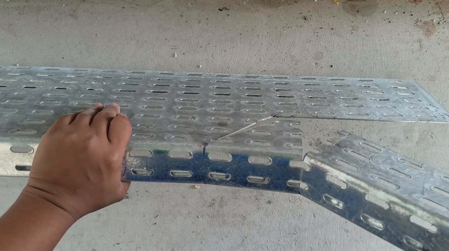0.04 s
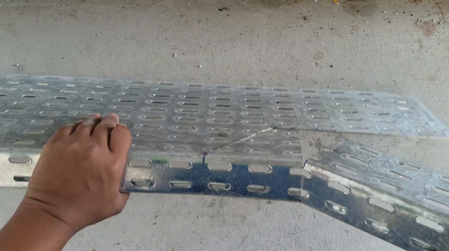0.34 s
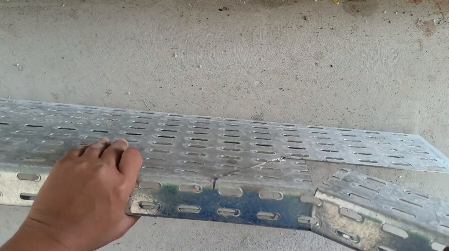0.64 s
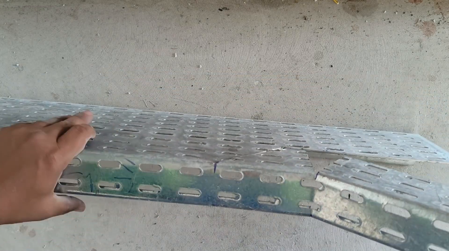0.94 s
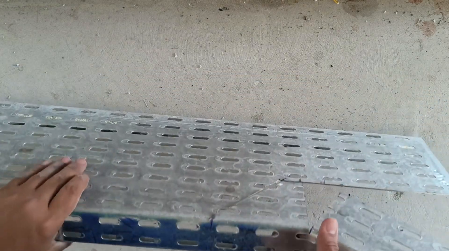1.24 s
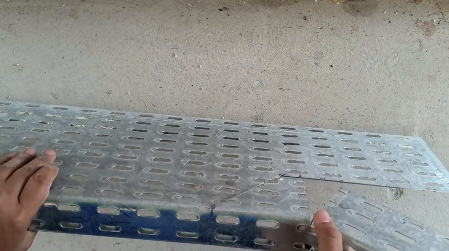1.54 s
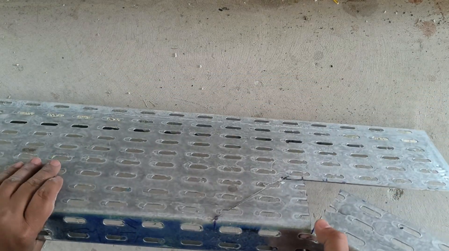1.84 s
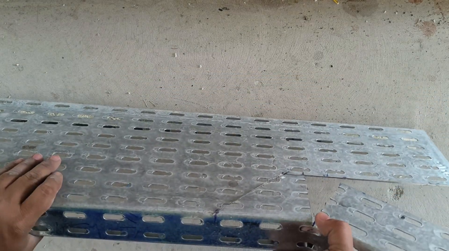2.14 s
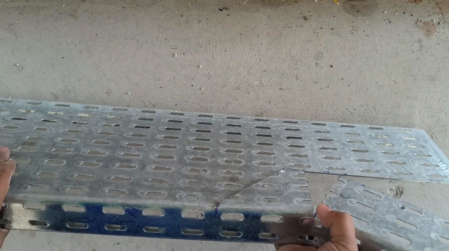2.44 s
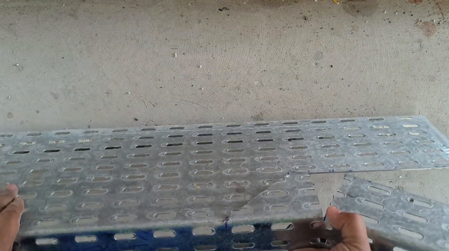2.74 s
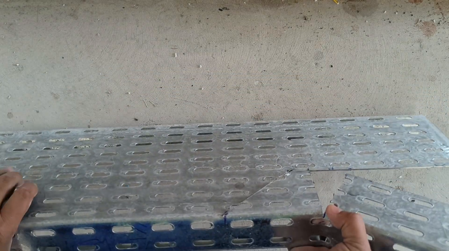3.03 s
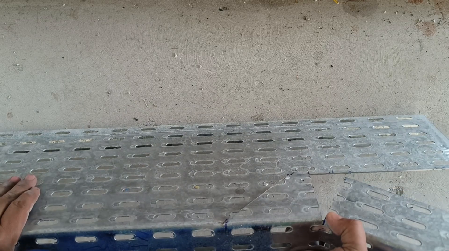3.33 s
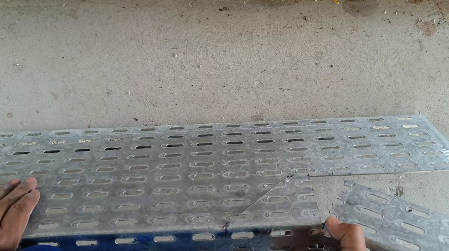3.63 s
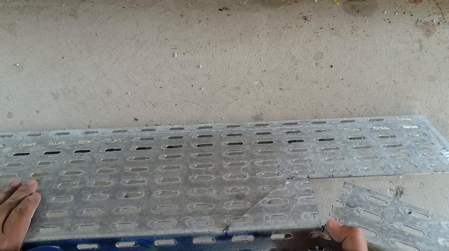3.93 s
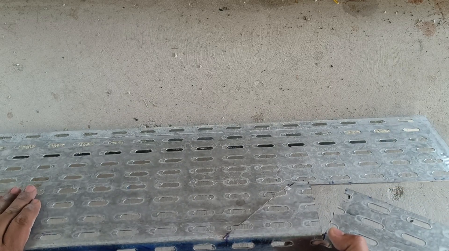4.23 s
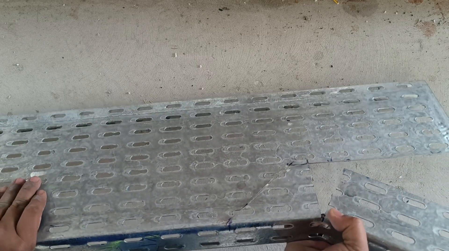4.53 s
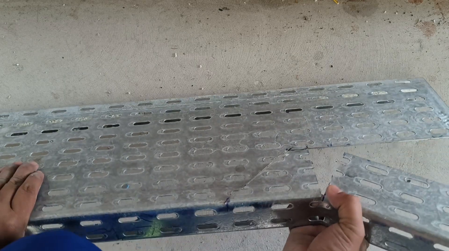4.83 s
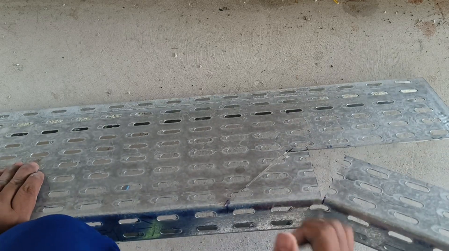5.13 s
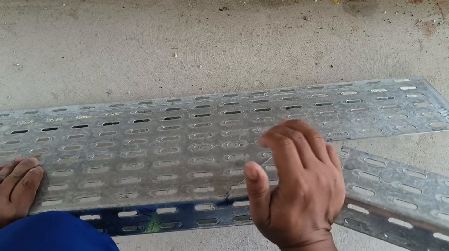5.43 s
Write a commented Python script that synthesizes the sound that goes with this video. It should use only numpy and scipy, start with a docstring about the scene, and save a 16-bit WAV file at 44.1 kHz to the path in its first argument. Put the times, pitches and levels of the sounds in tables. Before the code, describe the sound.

Three brief metallic scrapes come about two seconds apart as a slotted steel tray is shifted by hand on a concrete floor. Each one has a gritty hiss, a few knocks and its own ringing tone, and the first also squeaks. In the gaps, skin brushes the metal and grit or fingernails click lightly. The microphone is near, and the hard-walled workshop adds a short echo over a faint low hum.

```python
"""Steel cable tray on a workshop floor

A perforated tray is shoved three times over concrete, a little left of a closely spaced microphone pair.
Grit under its edges shakes the sheet, which rings differently each time it rests on new points.
Between the shoves hands slide over the metal and tap it; behind, the bare room echoes over a low rumble."""
import sys
import numpy as np
from scipy import signal
from scipy.fft import rfft, irfft, next_fast_len
from scipy.io import wavfile
from scipy.ndimage import map_coordinates

SR = 44100
rng = np.random.default_rng(int(sys.argv[2]) if len(sys.argv) > 2 else 0)


def inscribe(sig):
    """Save sig as 16-bit PCM at rate SR to the path in sys.argv[1].

    A 1-D sig is mono; a 2-D sig holds one channel per row.
    Samples are clipped to [-1, 1] before scaling.
    """
    pcm = np.round(np.clip(np.atleast_2d(sig).T, -1, 1) * 32767)
    wavfile.write(sys.argv[1], SR, pcm.astype(np.int16))


N = 250047

# The tray's moves; the last two run together as one shove. Levels in all tables are relative.
# Each row: start, speeding up and slowing in seconds, ease (small is a jerk), sheet, resonance and
# hiss levels in dB, length of the hiss as a share of the move's.
SHOVES = [(0.374, 0.21, 0.14, 1.94, -24, -24, -30.5, 1.04),
          (2.553, .16, 0.16, 0.71, -23.5, -27.5, -30.5, 1.01),
          (4.392, 0.048, 0.092, 2.64, -33.5, -48, -49.5, 0.59),
          (4.505, 0.053, 0.09, 0.58, -28, -30, -38.5, 0.76)]
# The edge knocks on the floor. Each row: time in seconds, level in dB.
BUMPS = [(0.427, -35), (0.449, -13), (0.481, -15), (0.535, -15), (0.627, -8.5), (1.837, -29.5), (2.57, -22),
         (2.667, -9.5), (2.689, -6), (2.73, -7.5), (2.755, -7.5), (4.435, -21), (4.519, -14),
         (4.591, -20.5)]
# The tray creeps under the grip. Each row: start, speeding up and slowing in seconds, level in dB.
CREEPS = [(0.881, 0.084, 0.8, -55), (1.6, 0.2, .07, -56), (1.828, 0.0095, .11, -46.5),
          (5.019, 0.04, 0.062, -55), (5.296, .022, 0.054, -56)]
# A slipping edge sings. Each row: midpoint and length in seconds, pitch in Hz, level in dB.
SQUEAKS = [(0.468, .07, 1402, -36), (0.471, 0.096, 3180, -37), (0.575, .15, 3219, -39),
           (1.649, 0.064, 1305, -63), (1.847, 0.033, 1350, -51), (5.322, .04, 1450, -65)]
# Hand slides. Each row: start, speeding up and slowing in seconds, rubbing and dust levels in dB.
RUBS = [(0.368, 0.033, .05, -50, -56.5), (0.76, 0.06, .08, -59, -72), (0.85, 0.11, 0.093, -57, -55.5),
        (1.14, 0.1, 0.067, -61.5, -73), (1.245, 0.11, 0.037, -51.5, -54), (1.388, .09, 0.055, -64, -56.5),
        (1.655, 0.021, 0.023, -63.5, -77), (1.705, .062, 0.05, -54.5, -59),
        (1.835, .05, 0.049, -50.5, -53.5), (1.925, 0.043, 0.022, -54.5, -61), (2.124, .022, .04, -61, -69),
        (2.189, 0.054, 0.074, -50.5, -50), (2.3, .13, .11, -62, -55), (2.98, 0.07, 0.18, -57.5, -67.5),
        (3.271, .09, .17, -64.5, -69.5), (3.514, 0.025, 0.037, -70, -80), (3.62, 0.021, 0.037, -72.5, -79),
        (3.765, 0.022, 0.027, -82, -87), (4.051, 0.077, 0.0353, -69, -70),
        (4.987, 0.077, 0.089, -59, -68.5), (5.285, 0.027, 0.078, -67, -75),
        (5.375, 0.062, .04, -62.5, -63.5), (5.548, .018, 0.043, -75, -74)]
# Grit and fingernails tick. Each row: time in seconds, level in dB, added treble and body in dB.
TICKS = [(0.2861, -33, -16.5, -20.5), (0.426, -28, -6, -2), (0.627, -20, -1, -2), (1.2804, -33, -6.5, -7.5),
         (1.3268, -42, -14, -10), (1.838, -46, -1, -16), (1.8716, -41, 0, -5.5), (1.8978, -43.5, 0, -2.5),
         (2.143, -52, -14, -8.5), (2.2543, -32, -7.5, -21), (2.689, -12.5, -9, -3.5),
         (3.021, -47, -3.5, -12), (3.083, -51, 1, -12), (3.786, -63, -8, -4), (4.1065, -44, -11, -7.5),
         (4.556, -20.5, -11.5, -2), (5.44, -37, -7, -4.5), (5.596, -61, -18, -8.5)]

# The sheet's broad colour in each move. Each row: frequency in Hz, spectral density in dB.
SHEET_PULL = [(80, -45), (170, -16), (280, -13), (400, -14.5), (700, 2), (950, -4.5), (1350, 8),
              (1700, -5.5), (2100, -5), (2900, -3), (4200, -8.5), (5200, -11), (7300, -10), (9500, -27.5),
              (12000, -63.5)]
SHEET_TURN = [(80, -32.5), (170, -26.5), (280, -4), (400, -17.5), (700, -6.5), (950, -9), (1350, -0.5),
              (1700, -0.5), (2100, -5), (2900, -2.5), (4200, -6), (5200, -12), (7300, -11.5), (9500, -29.5),
              (12000, -55.5)]
SHEET_NUDGE = [(180, -55), (300, -3.5), (490, -33), (954, -13), (1030, 5.5), (1120, -26), (1370, 5.5),
               (1940, -10.5), (3310, -12.5), (7760, -31.5), (9500, -53), (12400, -90), (20900, -120)]
SHEET_PUSH = [(80, -34), (170, -11.5), (280, -11.5), (400, -13), (700, -10.5), (950, -7.5), (1350, 1),
              (1700, 0), (2100, -8.5), (2900, -7), (4200, -14.5), (5200, -18.5), (7300, -17), (9500, -32),
              (12000, -67)]
# The colours of the other sounds. Each row: frequency in Hz, spectral density in dB.
FLEX_COLOUR = [(30, -16.5), (90, -6), (200, -3), (300, -3.5), (600, -31.5), (2000, -90)]  # the whole sheet flexing as it is dragged
HISS_COLOUR = [(5000, -26), (8500, -11), (8940, -17), (9520, -31.5), (10300, -13.5), (11900, -9.5),
               (12800, -1), (13900, -5.5), (15300, -6), (16000, -16)]  # crushed grit and dust
CREEP_COLOUR = [(100, -29.5), (300, -15.5), (700, 1.5), (950, -7), (1350, 2.5), (1800, -1), (2100, -19.5),
                (2600, -4.5), (4500, -20), (9000, -37)]
SKIN_COLOUR = [(200, -36.5), (600, -6.5), (1400, -5), (2050, -10.5), (2750, -2.5), (3600, 1.5),
               (4200, -8.5), (4600, -3.5), (6200, -9), (7100, -1.5), (9500, -27.5), (12400, -51)]
TICK_COLOUR = [(2500, -38), (4200, -13.5), (4900, 0), (6000, -6), (7000, -9.5), (8000, -9), (9500, -33.5),
               (12400, -51)]
RUMBLE_COLOUR = [(12, -25.5), (20, -11.5), (91, -11), (150, -10), (228, -5), (285, -9), (328, -7.5),
                 (459, -20), (873, -24), (1120, -28.5), (1330, -25), (1570, -34.5), (1710, -33),
                 (2260, -36.5), (16000, -72)]
# The strongest resonances for each way the tray rests. Each row: frequency in Hz, level in dB.
MODES_PULL = [(285, -10), (563, -5), (966, -2.5), (1009, -27), (1098, 0.5), (1262, -0.5), (1319, -6.5),
              (1408, -24), (1518, -3), (1669, -19.5), (1715, 0), (1803, -3.5), (2213, -11), (2328, -13.5),
              (2517, -7), (2606, -8), (2778, -2.5), (2998, -12), (3227, 1.5), (3327, -4), (3397, -21),
              (3502, -9), (3647, -17), (4447, -9), (4544, -23.5), (4788, -16.5), (5130, -7), (5284, -12)]
MODES_TURN = [(466, -8), (630, -7.5), (807, -15.5), (877, -15), (1192, -5.5), (1265, 1), (1332, -6),
              (1467, -8.5), (1645, -21), (1701, -13), (1750, -5), (2789, -14.5), (2826, -8), (3133, -17),
              (3265, -7), (3332, -30.5), (3445, -5.5), (3787, -15.5), (3873, -24.5), (4121, -31.5),
              (4452, -22.5), (4622, -6), (5324, -17.5), (5399, -8), (5448, -11), (6737, -7), (6912, -21.5),
              (7076, -20.5)]
MODES_PUSH = [(627, 3.5), (1074, 5), (1270, 8), (1343, 6.5), (1386, -17), (1491, 11), (1521, -7),
              (1604, -8), (1669, -14), (2229, -19), (2422, 3), (2530, 2.5), (2877, 8), (2980, -23),
              (3437, -10), (3599, -11.5), (3650, 3), (3787, 4.5), (3951, -5), (4358, -25), (4409, -20),
              (4468, -5), (5257, -5.5), (5661, -16), (6508, -30), (7055, -28)]
# Decay of the sheet's many weak modes, and of the room. Each row: frequency in Hz, t60 in seconds.
SHEET_DECAY = [(200, 0.15), (1500, 0.14), (5000, 0.14), (14000, .04)]
ROOM_DECAY = [(200, .85), (600, 1), (1300, 1.03), (2800, 1), (5500, 0.74), (9000, 0.33), (14000, 0.21)]
# How alike the two microphones hear. Each row: frequency in Hz, left-right likeness from -1 to 1.
MIC_LIKENESS = [(30, .75), (200, 0.95), (380, 0.74), (700, 0.29), (1290, -0.21), (2400, 0.11),
                (4400, -0.021)]


def shoves():
    """The main sound, ahead of the room: the tray is pulled in, turned, nudged and pushed away."""
    pull, turn, nudge, push = SHOVES
    return (shove(pull, SHEET_PULL, MODES_PULL) + shove(turn, SHEET_TURN, MODES_TURN)
            + shove(nudge, SHEET_NUDGE, MODES_PUSH) + shove(push, SHEET_PUSH, MODES_PUSH))


def shove(row, spectrum, modes):
    """The edge ploughs over concrete grains, which shake the sheet and hiss as they break."""
    start, rise, fall, ease, sheet_db, ring_db, hiss_db, hiss_share = row
    grains = grit(per_second=3500, spread_db=7, judder_db=1.5, judder_hz=119.77)
    force = grains * stroke(start, rise, fall, ease)
    # Faster is louder, and the hiss follows speed more steeply than the sheet does.
    crush = grains * stroke(start, hiss_share * rise, hiss_share * fall, ease * 1.2)
    wash = scattered(force, spectrum, direct_db=-9)
    flex = amp(-29) * through(force, sheet(FLEX_COLOUR, direct_db=-13))
    clang = through(force, ring(modes, t60=0.17))
    hiss = scattered(crush, HISS_COLOUR, direct_db=-4.5)
    return amp(sheet_db) * (wash + flex) + amp(ring_db) * clang + amp(hiss_db) * hiss


def bumps():
    """The edge catches and drops, knocking the whole sheet."""
    blows = np.zeros(N)
    for start, db in BUMPS:
        blows[round(start * SR)] = amp(db)
    clang = through(blows, ring(MODES_TURN, t60=0.3))
    wash = through(blows, sheet(SHEET_PULL, direct_db=-13.5))
    return amp(9.5) * wash + amp(9) * clang


def squeaks():
    """Stick and slip feed one mode, unsteady in pitch and strength."""
    out = np.zeros((2, N))
    mic_phase = np.array([[0], [np.pi / 2]])
    for middle, length, hz, db in SQUEAKS:
        size = round(length * SR)
        pitch = hz * (1 + 0.014 * wobble(240, SR // 4)[:size])
        phase = 2 * np.pi * np.cumsum(pitch) / SR
        swell = np.hanning(size) * amp(db + 3.3 * wobble(120, SR // 4)[:size])
        onset = round((middle - length / 2) * SR)
        out[:, onset:onset + size] += swell * np.sin(phase + mic_phase)
    return amp(8) * out


def creeps():
    """Slow slips of the edge stir mostly the sheet's low modes."""
    drive = sum(amp(db) * stroke(start, rise, fall, ease=1.3) for start, rise, fall, db in CREEPS)
    grains = grit(per_second=980, spread_db=8, judder_db=3, judder_hz=40)
    return scattered(drive * grains, CREEP_COLOUR, direct_db=-13, places=3)


def hands():
    """Dry skin catches and slides on the slotted metal, with a hiss of dust."""
    fidget = amp(3 * wobble(9, N))  # resting hands never keep quite still
    pressure, dust = amp(-84.5) * fidget, amp(-88.5) * fidget
    for start, rise, fall, rub_db, dust_db in RUBS:
        pressure += amp(rub_db) * stroke(start, rise, fall, ease=1.96)
        dust += amp(dust_db) * stroke(start, rise, fall, ease=1.9)
    grains = grit(per_second=2400, spread_db=7, judder_db=2, judder_hz=69.1)
    rubbing = scattered(grains * pressure, SKIN_COLOUR, direct_db=-9)
    hiss = through(grains * dust, sheet(HISS_COLOUR, direct_db=-0.5))
    return amp(4.5) * rubbing + amp(2) * hiss


def ticks():
    """Small hard contacts stir mostly the high modes."""
    out = np.zeros((2, N))
    for start, db, treble_db, body_db in TICKS:
        click = sheet(TICK_COLOUR, direct_db=-15.5)
        treble = amp(treble_db + 6) * sheet(HISS_COLOUR, direct_db=-20)
        body = amp(body_db + 8) * sheet(SKIN_COLOUR, direct_db=-21.5)
        tick = amp(db + 11) * (click + treble + body)
        span = out[:, round(start * SR):][:, :tick.shape[1]]
        span += tick[:, :span.shape[1]]
    return out


def stroke(start, rise, fall, ease):
    """Strength of a slide, 0 to 1: its speed, one smooth arch from rest to rest, to the power ease."""
    t = np.arange(round((rise + fall) * SR)) / SR
    speed = np.sin(np.pi / 2 * np.interp(t, [0, rise, rise + fall], [0, 1, 0]))
    return np.pad(speed ** ease, (round(start * SR), N))[:N]


def grit(per_second, spread_db, judder_db, judder_hz):
    """Tiny impacts of uneven size, surging as the contact sticks and slips; rms 1."""
    chance, sign, heft = rng.random((3, N))
    hits = np.flatnonzero(chance < per_second / SR)
    judder = judder_db * wobble(judder_hz, SR)[hits % SR]
    impacts = np.zeros(N)
    impacts[hits] = np.sign(sign[hits] - 0.5) * amp(spread_db * (2 * heft[hits] - 1) + judder)
    return unit(impacts)


def scattered(grains, spectrum, direct_db, places=2):
    """Each grain strikes one of a few places on the sheet, each with its own wash of modes."""
    place = rng.integers(0, places, N)
    return sum(through(grains * (place == k), sheet(spectrum, direct_db)) for k in range(places))


def sheet(spectrum, direct_db):
    """The sheet's answer to one contact: a crack, then a wash of dense modes."""
    response = tail(SHEET_DECAY, size=6000)
    arrivals = rng.integers(0, 20, 2)  # the contact lies at its own distance from each microphone
    response[[0, 1], arrivals] += amp(direct_db)
    return lossless(signal.fftconvolve(colour(spectrum)[None], response, axes=1))


def ring(modes, t60):
    """Strong resonances, lasting t60 seconds at 1 kHz and less above."""
    t = np.arange(SR // 4) / SR
    out = np.zeros((2, len(t)))
    mic_phase = np.array([[1], [-1]]) * np.pi / 4  # a quarter cycle between the microphones
    for hz, db in modes:
        life = t60 * np.sqrt(1000 / hz)
        phase = rng.uniform(0, 2 * np.pi) + rng.choice([-1, 1]) * mic_phase
        decay = amp(db - 60 * t / life) / np.sqrt(life)
        out += decay * np.sin(2 * np.pi * hz * t + phase)
    build_up = 1 - np.exp(-t / 0.0023)  # waves take time to cross the sheet
    return lossless(out * build_up)


def room(x, delay_s=0.012, drift_s=0.3):
    """Farther off, the bare walls answer, drifting to and fro between two echo patterns."""
    drift = 2 * np.pi * np.arange(N) / SR / drift_s
    echo = np.zeros((2, N))
    for share in (np.cos(drift), np.sin(drift)):
        walls = np.pad(tail(ROOM_DECAY, size=44000), ((0, 0), (round(delay_s * SR), 0)))
        echo += through(x * share, walls)
    return echo


def rumble():
    """Room tone: the workshop's steady low background."""
    noise = filtered(rng.standard_normal((2, N)), lambda hz: amp(along(RUMBLE_COLOUR, hz)))
    return amp(-52) * unit(noise)


def microphones(x):
    """A closely spaced pair hears long waves alike and short waves apart."""
    mid = filtered(x[0] + x[1], lambda hz: np.sqrt(1 + along(MIC_LIKENESS, hz))) / 2
    side = filtered(x[0] - x[1], lambda hz: np.sqrt(1 - along(MIC_LIKENESS, hz))) / 2
    return np.array([mid + side, mid - side])


def tail(decays, size):
    """A diffuse stereo decay in which each frequency dies at its own speed."""
    hz, t, noise = signal.stft(rng.standard_normal((2, size)), SR, nperseg=256)
    t60 = along(decays, hz)[:, None]
    fading = noise * amp(-60 * t / t60) / np.sqrt(t60)
    return lossless(signal.istft(fading, SR, nperseg=256)[1])


def colour(spectrum, size=4096):
    """The causal impulse response of a (Hz, dB) spectrum."""
    gain = amp(along(spectrum, np.fft.rfftfreq(size, 1 / SR)))
    cepstrum = irfft(np.log(gain + 1e-6))
    cepstrum[1:size // 2] *= 2  # folded onto positive time for minimum phase
    cepstrum[size // 2 + 1:] = 0
    return irfft(np.exp(rfft(cepstrum)))


def through(x, response):
    """The sounding stretch of x sent through a stereo impulse response."""
    x, out = np.atleast_2d(x), np.zeros((2, N))
    sounding = np.flatnonzero(x[0])
    if len(sounding):
        first, last = sounding[0], sounding[-1]
        stereo = x[:, first:last + 1] * np.ones((2, 1))
        wet = signal.oaconvolve(stereo, response, axes=1)[:, :N - first]
        out[:, first:first + wet.shape[1]] = wet
    return out


def filtered(x, response):
    """x shaped by a gain that depends on frequency."""
    size = next_fast_len(N + SR // 2)
    gain = response(np.fft.rfftfreq(size, 1 / SR))
    return irfft(rfft(x, size) * gain, size)[..., :N]


def wobble(rate, size):
    """A smooth random curve of size samples, rate knots a second."""
    knots = rng.standard_normal(int(size * rate / SR) + 4)
    return map_coordinates(knots, [np.arange(size) * rate / SR])


def along(points, hz):
    """(Hz, value) points read at hz on a log axis."""
    freqs, values = np.transpose(points)
    return np.interp(np.log(hz + 1), np.log(freqs + 1), values)


def amp(db):
    """Decibels to gain."""
    return 10 ** (np.asarray(db) / 20)


def unit(x):
    """x at rms 1."""
    return x / np.sqrt(np.mean(x ** 2) + 1e-20)


def lossless(response):
    """An impulse response scaled to energy 1 in each channel."""
    return response / np.sqrt(np.sum(response ** 2, axis=-1, keepdims=True) + 1e-20)


def scene():
    """From the microphones, the tray lies a little to the left in a hard-walled room."""
    scrape = shoves() + bumps() + creeps() + squeaks()
    touch = hands() + ticks()
    direct = (scrape + touch) * amp([[0.9], [-0.9]])
    echo = room(amp(-7) * scrape + amp(-11) * touch)
    return microphones(direct + echo + rumble())


def record(dry, top_hz=15900):
    """The recorder keeps nothing above its band limit."""
    return filtered(dry, lambda hz: hz < top_hz)


dry = scene()
out = record(dry)
inscribe(out)
```